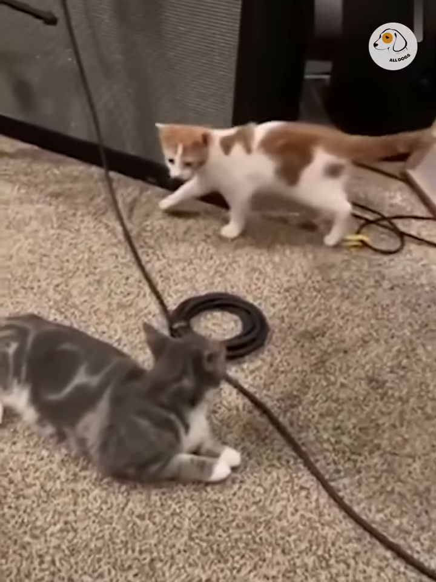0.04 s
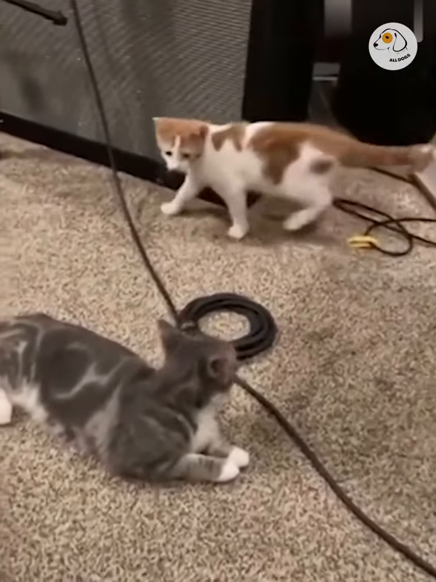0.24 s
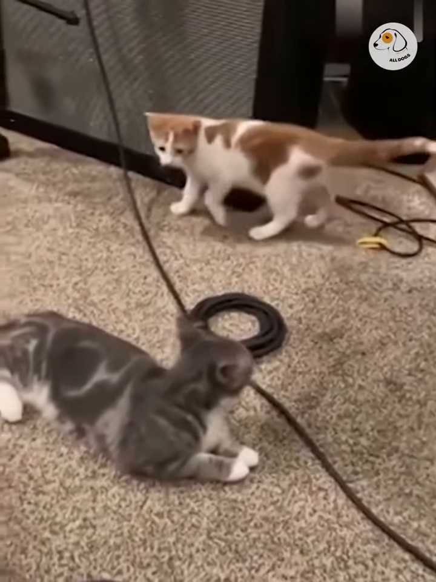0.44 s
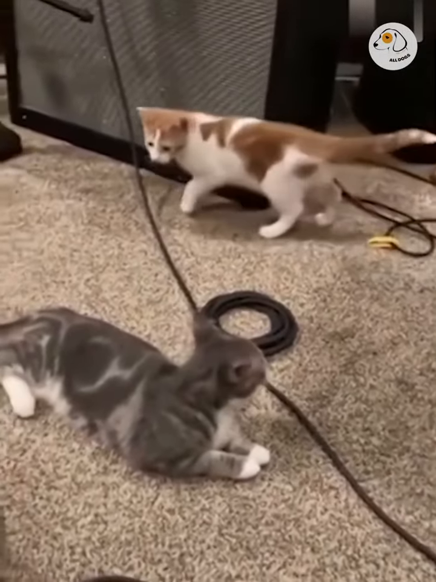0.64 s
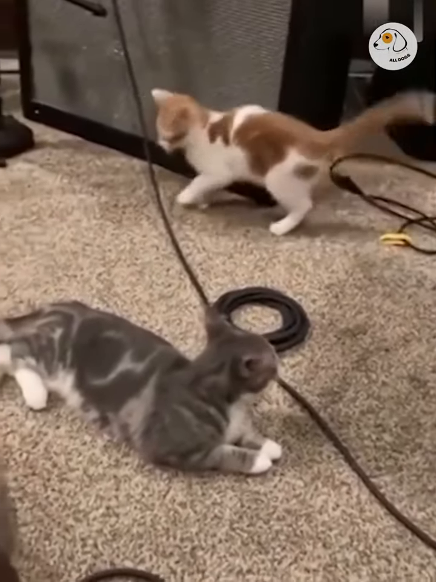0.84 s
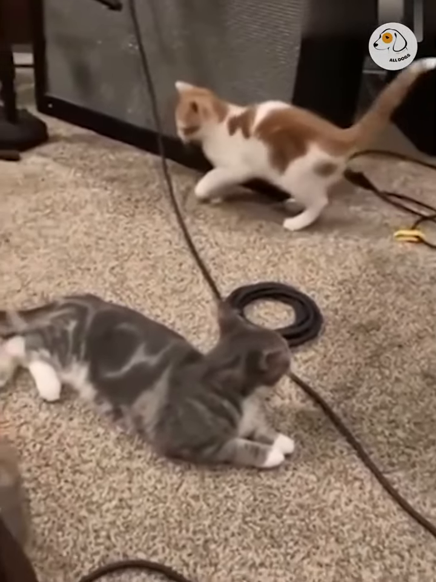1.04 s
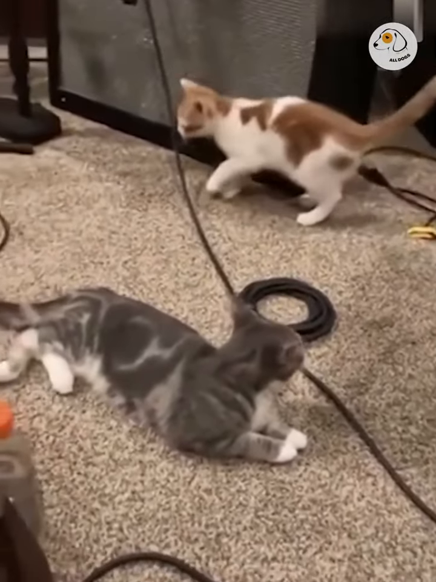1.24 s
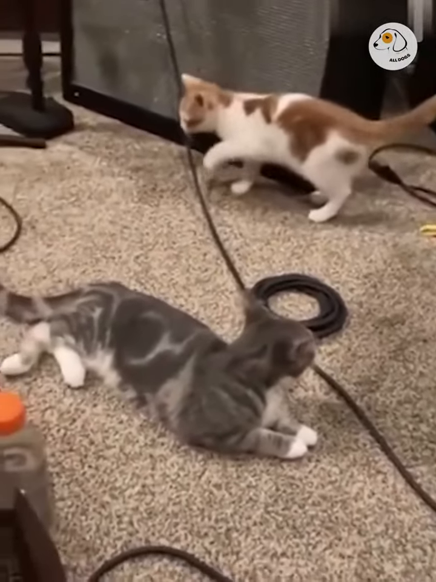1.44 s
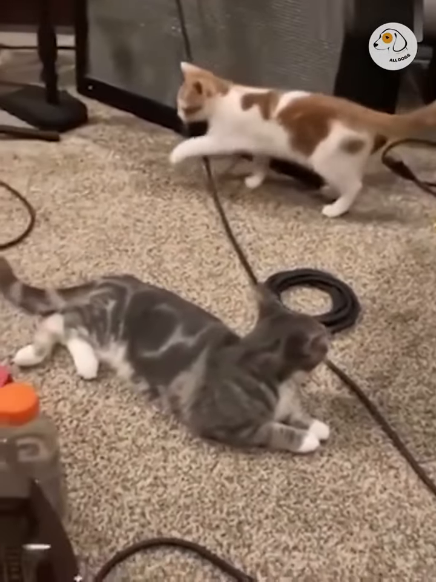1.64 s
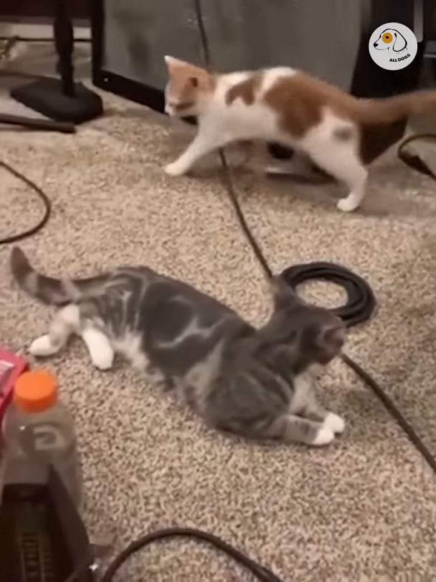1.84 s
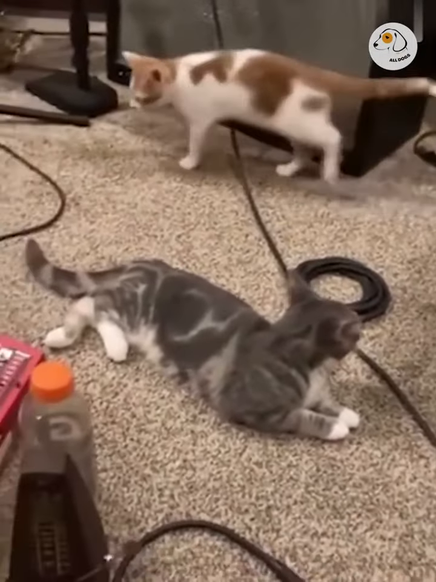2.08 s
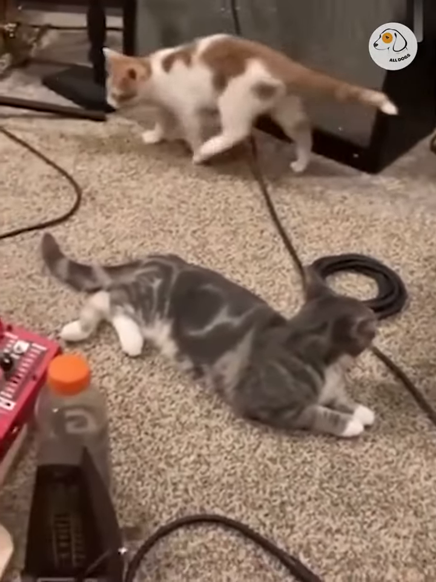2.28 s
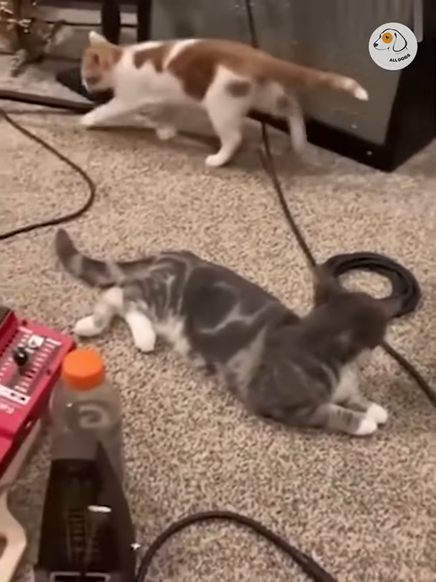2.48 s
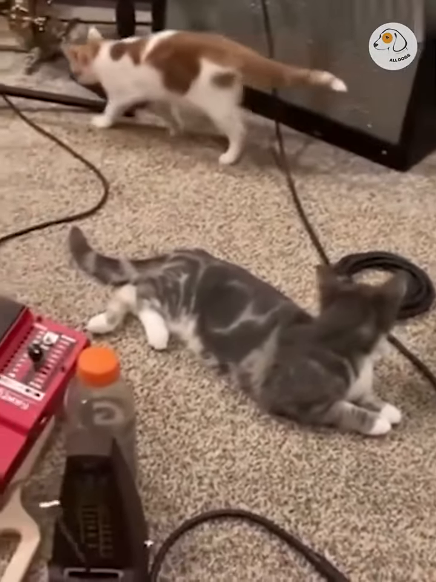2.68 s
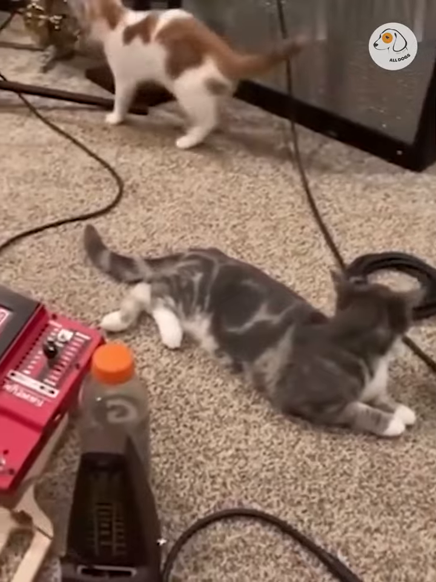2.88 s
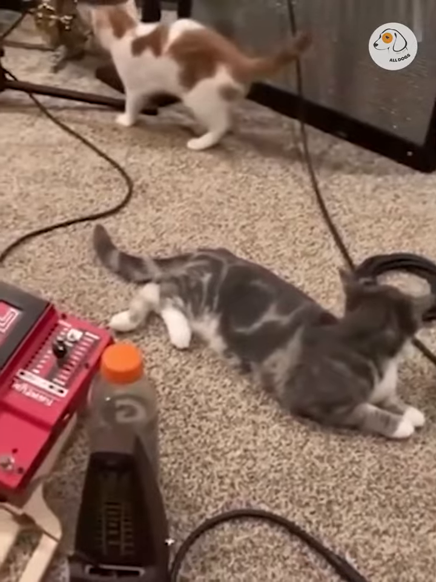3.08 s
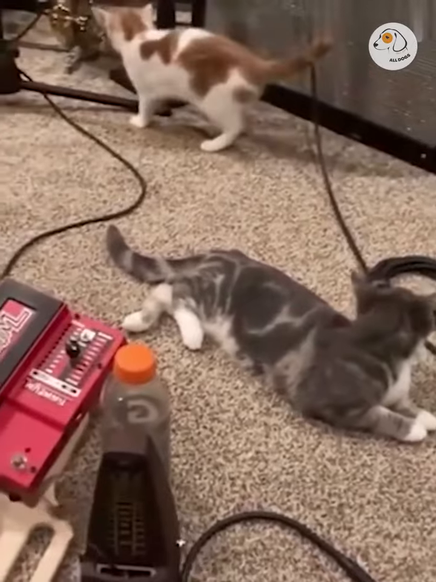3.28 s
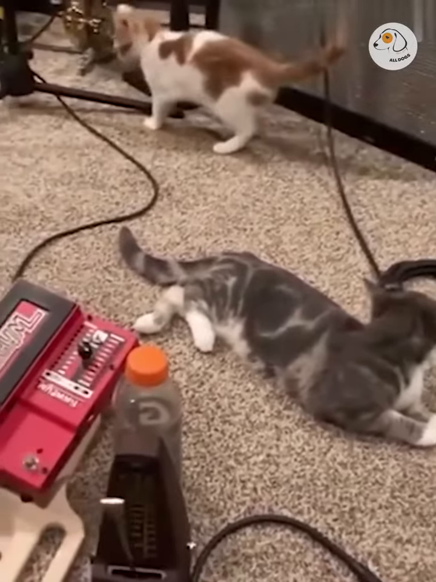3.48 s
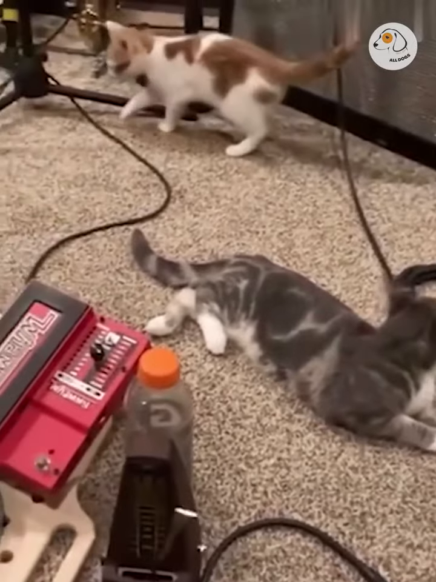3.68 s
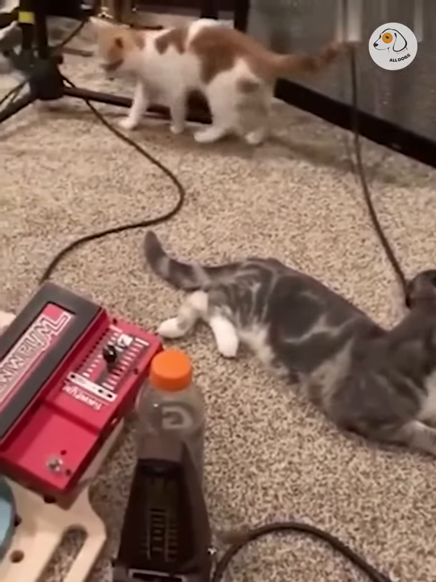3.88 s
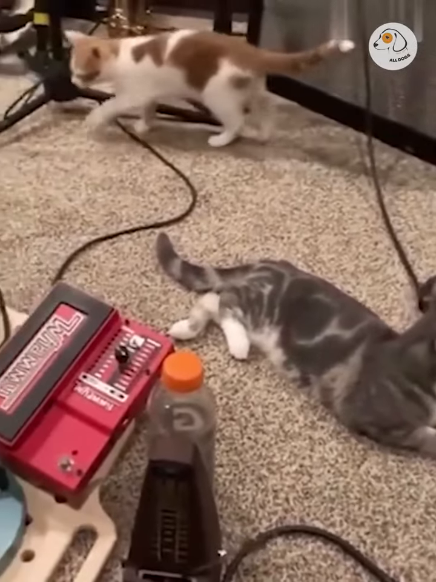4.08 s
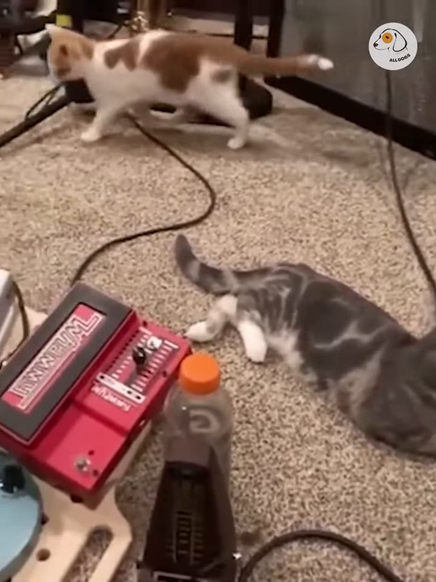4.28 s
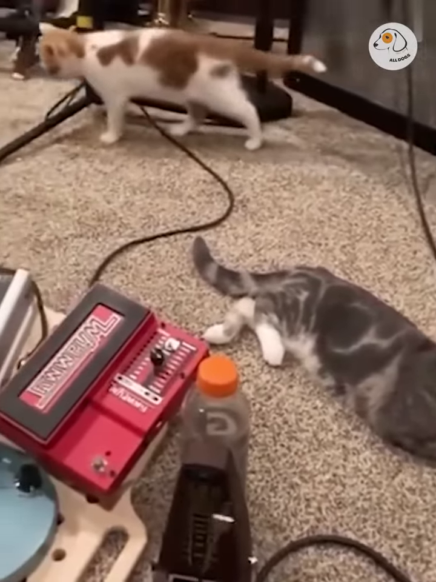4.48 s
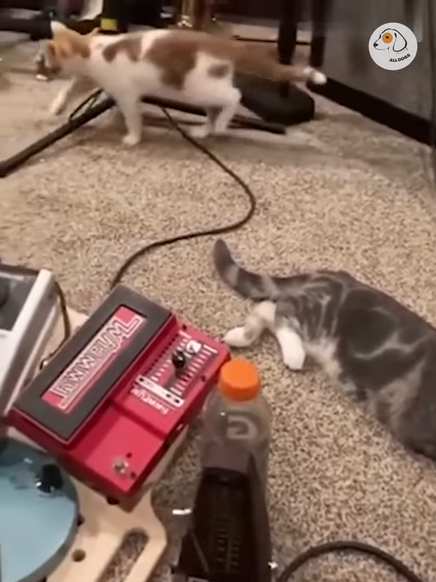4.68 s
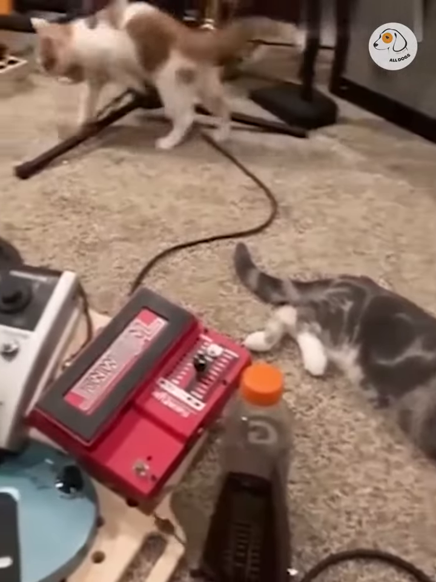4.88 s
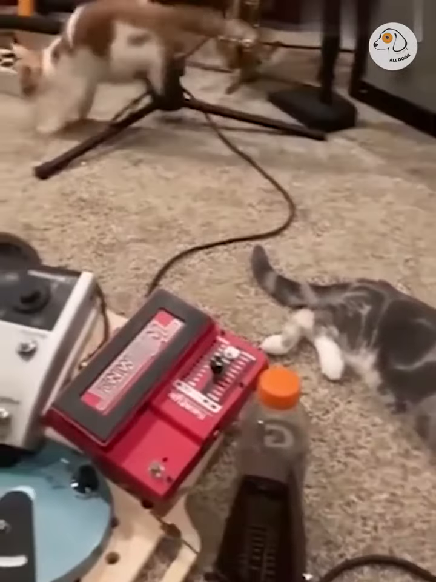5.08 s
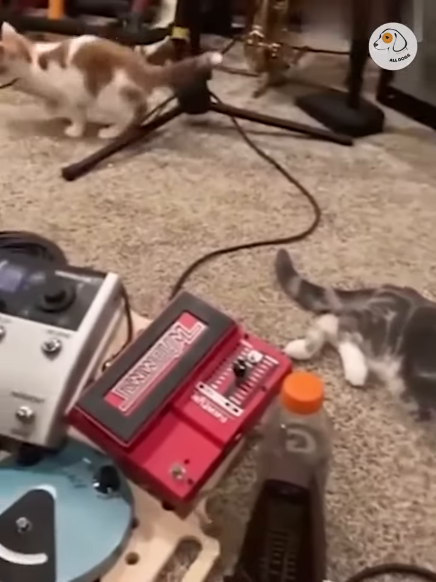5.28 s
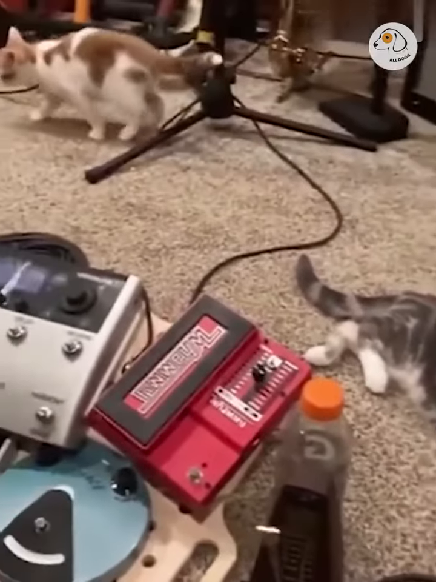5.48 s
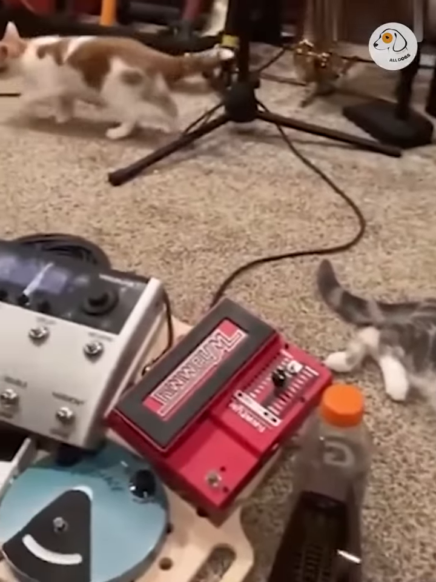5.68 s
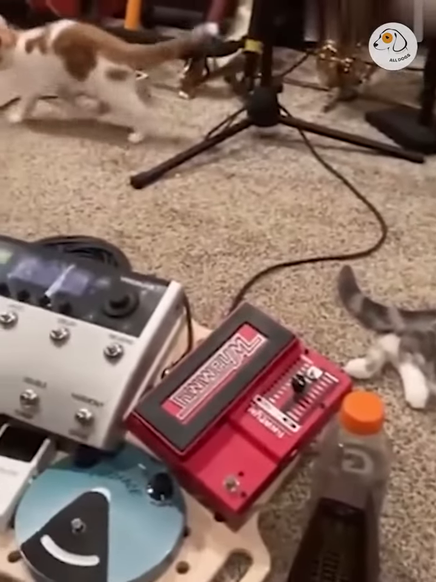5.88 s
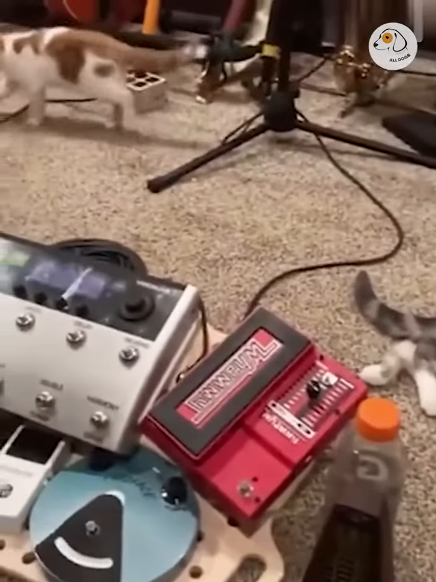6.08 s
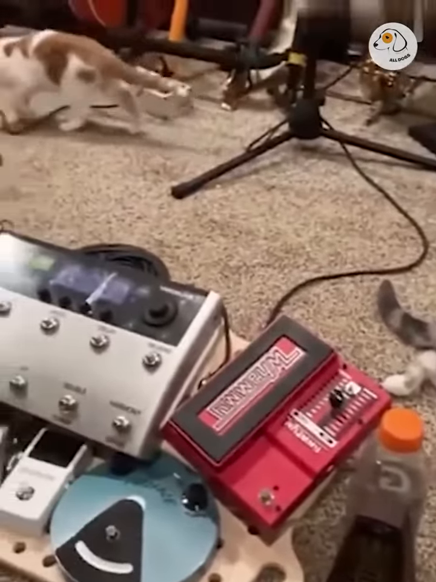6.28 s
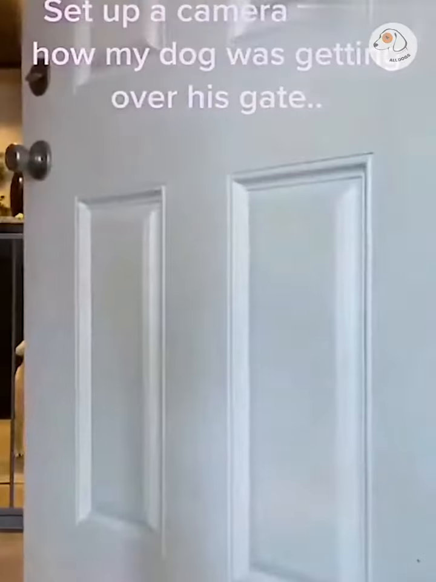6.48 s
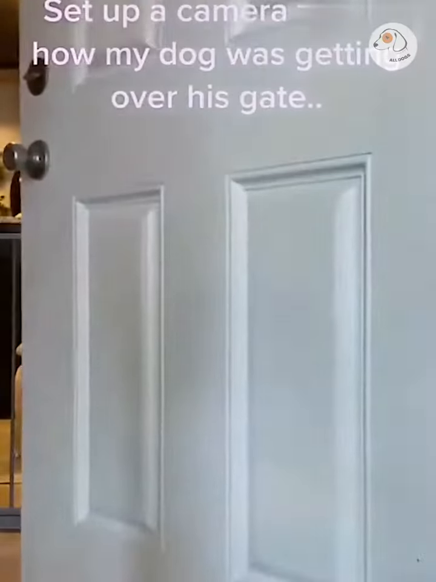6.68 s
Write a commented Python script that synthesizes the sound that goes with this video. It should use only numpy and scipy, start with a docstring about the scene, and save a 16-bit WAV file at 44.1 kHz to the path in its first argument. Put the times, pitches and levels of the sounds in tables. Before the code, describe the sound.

A small, quiet carpeted room with a soft, steady ventilation hum, mostly low and central, with faint wider air above it. A pendulum metronome close to the microphone ticks slowly, at about 0.6, 1.6, 2.65, 3.65, 4.7 and 5.7 seconds. Each tick is a loud, sharp steel crack with a hollow knock, a bright clink and a tiny loose rattle, ringing for less than a tenth of a second before a short reflection from the room. The ticks differ slightly in brightness; the first is crisp and the fifth a little softer. Nothing else sounds between them but the hum. At about 6.4 seconds the room cuts off abruptly, and a rush of hiss and rumble appears in the left ear only, the right silent. Around 6.6 seconds a deep thump lands, and grainy, faintly ringing midrange noise surges two or three times until the end.

```python
"""A pendulum metronome ticks about once a second on the carpet of a small, quiet room.
Ventilation hums low all the while: shaped noise plus narrow resonances. Each beat is a cracking click
that sets the hollow case and the steel works ringing, as fading sine tones, and the room answers.
Near the end the room falls silent and a rush of noise takes over in the left ear: hiss and rumble,
with one low thump and a grainy midrange that surges."""
import sys
import numpy as np
from scipy import signal
from scipy.fft import rfft, irfft, next_fast_len
from scipy.io import wavfile

SR = 44100
rng = np.random.default_rng(int(sys.argv[2]) if len(sys.argv) > 2 else 0)


def log_audio(samples):
    """Write samples as a 16-bit WAV file to the path given in sys.argv[1]."""
    # one column per channel
    frames = np.atleast_2d(samples).T
    # limit to full scale, then quantise
    limited = np.clip(frames, -1, 1)
    pcm = np.round(limited * 32767).astype(np.int16)
    wavfile.write(sys.argv[1], SR, pcm)


N = 297221
TIME = np.arange(N) / SR

# Ventilation, colour of its rumble and air: (frequency [Hz], relative density [dB per Hz])
AIR_COLOUR = [(20, -36), (35, -16), (49, -2.5), (150, -1), (200, -9.5), (280, -9), (310, -16), (460, -27.5),
              (800, -28.5), (1600, -33.5), (2000, -38), (4700, -46), (5600, -55.5), (10800, -60.5),
              (13000, -81), (16000, -92)]
# Ventilation, how wide the air sounds: (frequency [Hz], side minus mid [dB])
AIR_SIDE = [(110, -58.5), (380, -35), (700, -0.5), (1300, -5), (4400, -4), (8000, -16.5)]
# Ventilation, narrow duct resonances: (frequency [Hz], width [Hz], rms level [dB])
DUCT_HUM = [(159.2, 15, -42.5), (222.5, 4, -46.5), (257.6, 7.2, -43.5), (361.5, 17, -52),
            (498.5, 8.6, -66.5), (683, 9, -59), (716.5, 5, -64), (773.4, 13, -61), (954.6, 12, -66.5),
            (1590, 160, -70)]

# Rush, colour of the rumble: (frequency [Hz], relative density [dB per Hz])
RUMBLE_COLOUR = [(15, -15.5), (35, -27), (52, -1), (80, -6), (150, -16), (400, -37), (1500, -82)]
# Rush, colour of the hiss: (frequency [Hz], relative density [dB per Hz])
HISS_COLOUR = [(88, -43), (150, -1), (263, -7.5), (352, -5.5), (912, -9.5), (1170, -9.5), (1940, -14.5),
               (6110, -15), (9920, -29.5), (11400, -26), (15500, -27)]
# Rush, colour of the midrange: (frequency [Hz], relative density [dB per Hz])
MIDRANGE_COLOUR = [(100, -7), (300, 13.5), (700, -6), (1400, -1), (2200, 1), (4500, -9), (12000, -39)]
# Rush, resonances that ring in the surges: (frequency [Hz], width [Hz], relative level [dB])
SURGE_RINGS = [(1157, 16, 1.5), (1356, 23, 2), (1703, 11, 2), (1896, 9.1, -6), (2330, 45, -10)]
# Rush, swells of the midrange: (time of the top [s], height [dB])
MIDRANGE_SURGES = [(6.584, 14.5), (6.66, 7), (6.706, 12.5)]
# Rush, one low thump: (time [s], frequency [Hz], level [dB], time to fall 60 dB [s])
LOW_THUMP = (6.6, 53, -12.5, .22)
RUSH_START_S = 6.387
SURGE_ATTACK_S, SURGE_RELEASE_S = 0.0091, 0.08  # time constants of climb and fall
RUMBLE_FOLLOWS, HISS_FOLLOWS = 0.21, 0.077  # share of a surge's dB that lifts rumble and hiss too

# How the room answers a beat: (frequency [Hz], relative level [dB], time to fall 60 dB [s])
ROOM_BANDS = [(294.4, -9, 0.53), (694, 4, 0.16), (1535, 4.5, 0.21), (3060, 4.5, 0.185), (5700, 5, 0.15),
              (10500, 10.5, 0.11), (13000, 11, .095), (16000, 4, 0.08)]
# Ringing modes of case and steel works, before each beat's own balance:
# (frequency [Hz], relative level [dB], time to fall 60 dB [s])
CASE_MODES = [(608.5, -29.5, 0.082), (757.6, -18.5, 0.14), (979, -27, 0.09), (1135, -14, 0.045),
              (1233, -8, 0.078), (1282, -5.5, 0.074), (1413, -16.5, 0.045), (1668, -19, 0.028),
              (1746, -15.5, 0.055), (1872, -12.5, 0.05), (2070, -7, 0.085), (2142, -4.5, 0.077),
              (2353, -20.5, 0.044), (2500, -19, 0.05), (2800, -17, .05), (3100, -18, .05),
              (3280, -26.5, 0.018), (3380, -18.5, 0.053), (5170, -28, 0.045), (6180, -9.5, 0.04),
              (6920, -19, 0.04), (6420, -16.5, .045), (7400, -22, 0.033), (8970, -20.5, 0.044),
              (9360, -26.5, 0.03), (10400, -22.5, 0.02), (10284, -28.5, .045), (10683, -25, .07),
              (1270, -39, 0.51), (2600, -46.5, 0.39), (2086, -35.5, 0.5), (2156, -36.5, 0.58),
              (2160, -38, 0.68), (2140, -37, 0.47), (6210, -63, 1)]
# Colour of the pallet's crack: (frequency [Hz], relative density [dB per Hz])
CRACK_COLOUR = [(150, -25.5), (350, -5), (520, -6), (740, 2), (900, -6.5), (1500, 0), (2800, -5.5),
                (4200, -11.5), (6200, -9), (8000, -12), (10500, -8.5), (12000, -17), (15500, -16.5)]
# Beats of the escapement: (time [s], strength [dB], wait from first touch to landing [s],
# first touch [dB], lift of the high case modes [dB], lift of the crack and clink [dB],
# glint in the low treble [dB], lift of the top octave [dB], delay of the ceiling echo [s])
ESCAPEMENT_BEATS = [(0.628, -2.5, 0.00086, 3, -1, 5.5, 1, 1, 0.012),
                    (1.6275, -2, 0.00094, -11, 0.5, 1.5, 5, -6, .0160),
                    (2.648, -2.5, .0015, -11.5, 1, 6, 4.5, 2, .0165),
                    (3.6504, -2, .0011, -14.5, 0, 1.5, 2.5, 2.5, .0170),
                    (4.6697, -3.5, .0016, -4, 0.5, -3, -0.5, -2.5, 0.022),
                    (5.6724, -2, .0016, -10, 0, 1, -8.5, -3.5, .0190)]
GLINT_WIDTH_HZ, TOP_OCTAVE_HZ = 680, 8000
BOUNCE_HZ = 1500  # below this the beat is a clean knock, above it a chattering crack
TOUCHES_PER_S = 5000
PARTS_T60_S, PARTS_UNEVEN_DB = 0.035, 3.5  # fall time and random spread of the small parts
CUTOFF_HZ = 15900


def from_db(db):
    """Turn decibels into a plain multiplier."""
    return 10 ** (np.asarray(db) / 20)


def at_hz(points, hz, axis=1):
    """Read one column of a table between its points, on a log-frequency axis."""
    table = np.array(points)
    return np.interp(np.log(np.maximum(hz, 1)), np.log(table[:, 0]), table[:, axis])


def noise(gain_at, size):
    """Noise of rms 1 whose spectrum follows gain_at(Hz)."""
    spectrum = rfft(rng.standard_normal(size)) * gain_at(np.fft.rfftfreq(size, 1 / SR))
    x = irfft(spectrum, size)
    return x / np.std(x)


def coloured(colour, size):
    """Noise with the balance of bass and treble listed in a colour table; rms about 1."""
    return noise(lambda hz: from_db(at_hz(colour, hz)), next_fast_len(size))[:size]


def resonant(rows, size):
    """Noise concentrated around resonances, each with its centre, width and level."""
    out = 0
    for centre, width, level_db in rows:
        ringing = noise(lambda hz: 1 / (1 + ((hz - centre) / width) ** 2), size)
        out = out + from_db(level_db) * ringing
    return out


def dying(t, t60, rise_s):
    """Loudness curve that swells from t = 0 while a decay of 60 dB per t60 pulls it down."""
    t = np.maximum(t, 0)
    return (1 - np.exp(-t / rise_s)) * np.exp(-np.log(1000) * t / t60)


def stereo(mid, side):
    """Left and right ear from the shared middle and the difference between the sides."""
    return np.array([mid + side, mid - side])


def delayed(t, x, wait_s):
    """The same sound, later."""
    return np.interp(t - wait_s, t, x, left=0)


def dulled(x, cut_hz):
    """Second-order low-pass: the treble above cut_hz fades away."""
    return signal.sosfilt(signal.butter(2, min(cut_hz, 0.45 * SR), fs=SR, output="sos"), x)


def pulse(level_db, size):
    """The most compact click, starting at once, with this spectrum (dB per FFT bin); energy 1."""
    # folding the cepstrum onto positive times gives the minimum-phase click
    cepstrum = irfft(np.log(from_db(level_db)), size)
    cepstrum[1:size // 2] *= 2
    cepstrum[size // 2 + 1:] = 0
    x = irfft(np.exp(rfft(cepstrum)), size)
    return x / np.linalg.norm(x)


def ventilation(air_db=-38.5):
    """Soft rumbling air with narrow duct resonances; the bass is central, the hiss wider."""
    size = next_fast_len(N)
    hz = np.fft.rfftfreq(size, 1 / SR)
    side = irfft(rfft(coloured(AIR_COLOUR, size)) * from_db(at_hz(AIR_SIDE, hz)), size)
    air = from_db(air_db) * stereo(coloured(AIR_COLOUR, size), side)
    return (air + resonant(DUCT_HUM, size))[:, :N]


def surges(rows):
    """Lift in dB: each surge climbs quickly to its top and sinks back more slowly."""
    lift_db = 0
    for s, height_db in rows:
        climb, fall = (TIME - s) / SURGE_ATTACK_S, (s - TIME) / SURGE_RELEASE_S
        lift_db = lift_db + height_db * np.exp(np.minimum(climb, fall))
    return lift_db


def low_thump():
    """One deep sine tone that swells quickly and dies away."""
    s, hz, level_db, t60 = LOW_THUMP
    t = TIME - s
    return from_db(level_db) * dying(t, t60, SURGE_ATTACK_S) * np.sin(2 * np.pi * hz * t)


def rush(rumble_db=-34, hiss_db=-30, mid_db=-44.0, rings_db=-53, grain_db=-1.0, grain_hz=120):
    """Hiss, rumble, thump and a grainy, ringing midrange that swells; in the left ear only."""
    size, lift_db = next_fast_len(N), surges(MIDRANGE_SURGES)
    rumble = from_db(rumble_db + RUMBLE_FOLLOWS * lift_db) * coloured(RUMBLE_COLOUR, N)
    hiss = from_db(hiss_db + HISS_FOLLOWS * lift_db) * coloured(HISS_COLOUR, N)
    # slow noise, in dB, makes the midrange level flutter
    grain = grain_db * noise(lambda hz: 1 / (1 + (hz / grain_hz) ** 2), size)[:N]
    midrange = from_db(mid_db) * coloured(MIDRANGE_COLOUR, N)
    midrange = midrange + from_db(rings_db) * resonant(SURGE_RINGS, size)[:N]
    left = rumble + low_thump() + hiss + from_db(lift_db + grain) * midrange
    return np.array([left, np.zeros(N)])


def wash(t, first_per_s=1200, crowding_s=0.02):
    """Reflections, sparse at first, crowding in with the square of the time; mid and side."""
    chance = np.minimum(first_per_s * (1 + (t / crowding_s) ** 2) / SR, 1)
    arrives = rng.random((2, len(t))) < chance
    # fewer reflections are each made stronger, so the average power stays even
    return arrives * rng.choice([-1, 1], (2, len(t))) / np.sqrt(chance)


def room_response(t, build_s=0.018, late_db=-23, late_stretch=3.3, side_db=-9):
    """A wash of reflections, dying faster in the treble over a faint longer tail."""
    mid, side = wash(t)
    arrivals = rfft(stereo(mid, from_db(side_db) * side))
    hz = np.fft.rfftfreq(len(t), 1 / SR)
    centres = np.log([row[0] for row in ROOM_BANDS])
    out = 0
    # each row of the identity matrix picks out one band, blending into its neighbours
    for share, (_, level_db, t60) in zip(np.eye(len(ROOM_BANDS)), ROOM_BANDS):
        band = irfft(arrivals * np.interp(np.log(hz + 1), centres, share), len(t))
        early = dying(t, t60, build_s)
        late = from_db(late_db) * dying(t, late_stretch * t60, build_s)
        out = out + band * from_db(level_db) * (early + late)
    return out


def blows(t, t60, rise_s, landing):
    """Loudness curve of a first touch and the landing that follows it."""
    wait_s, first_db = landing
    first = from_db(first_db)
    return first * dying(t, t60, rise_s) + (1 - first) * dying(t - wait_s, t60, rise_s)


def contact(t, glint_db, top_db, glint_hz=4800):
    """A click in the crack's colour, with the low treble and top of this beat raised or lowered."""
    hz = np.fft.rfftfreq(len(t), 1 / SR)
    glint = glint_db * np.exp(-0.5 * ((hz - glint_hz) / GLINT_WIDTH_HZ) ** 2)
    top = top_db * np.clip(np.log2((hz + 1) / TOP_OCTAVE_HZ) * 2 + 0.5, 0, 1)
    return pulse(at_hz(CRACK_COLOUR, hz) + glint + top, len(t))


def case_ring(t, high_db, landing, split_hz=1550, rise_s=0.0005, scatter_db=2.5, detune=0.0053):
    """The blow rings every mode; level and pitch vary a little from beat to beat."""
    out = 0
    for k, (hz, level_db, t60) in enumerate(CASE_MODES):
        lift_db = high_db * (hz > split_hz) + scatter_db * rng.standard_normal()
        pitch = hz * (1 + detune * rng.standard_normal())
        tone = blows(t, t60, rise_s, landing) * np.sin(2 * np.pi * pitch * t)
        out = out + (-1) ** k * from_db(level_db + lift_db) * tone
    return out


def pallet_crack(t, touch, landing, t60=0.024, rise_s=0.0003):
    """Steel chatters on steel: a dense cluster of touches as the tooth lands; energy 1."""
    hits = (rng.random(len(t)) < TOUCHES_PER_S / SR) * rng.choice([-1, 1], len(t))
    touches = hits * blows(t, t60, rise_s, landing)
    crack = signal.fftconvolve(touches, touch)[:len(t)]
    crack = signal.sosfilt(signal.butter(2, BOUNCE_HZ, "high", fs=SR, output="sos"), crack)
    return crack / (np.linalg.norm(crack) + 1e-12)


def small_parts(t, count=72, low_hz=2300, high_hz=15800, rise_s=0.0006):
    """Treble modes of wheel, spring and rod, one row each, shared by all beats; and their pitches."""
    hz = low_hz * (high_hz / low_hz) ** ((np.arange(count) + rng.random(count)) / count)
    gain = from_db(PARTS_UNEVEN_DB * rng.standard_normal(count)) * np.sqrt(hz / low_hz)
    tones = np.sin(2 * np.pi * hz[:, None] * t)
    return gain[:, None] * tones * dying(t, PARTS_T60_S, rise_s), hz


def clink(touch, parts, hz):
    """The small parts ring as strongly as the touch excites their pitches; energy 1."""
    drive = np.interp(hz, np.fft.rfftfreq(len(touch), 1 / SR), np.abs(rfft(touch)))
    x = (rng.choice([-1, 1], len(hz)) * drive) @ parts
    return x / np.linalg.norm(x)


def rattle(t, jolt, count=4, earliest_s=0.008, latest_s=0.034, t60=0.3):
    """The loose rod jogs the case and small parts a few more times, ever more lightly."""
    waits = rng.uniform(earliest_s, latest_s, count)
    signs = rng.choice([-1, 1], count)
    return sum(sign * from_db(-60 * wait / t60) * delayed(t, jolt, wait)
               for wait, sign in zip(waits, signs))


def metronome(ring_db=-5.0, crack_db=0.5, steel_db=-1.0, rattle_db=-2, rattle_knock_db=5, knock_db=3,
              ring_send_db=-39, knock_send_db=-19, crack_send_db=-25, parts_send_db=-22,
              ceiling_db=-6, knock_echo_db=5, steel_echo_db=-4,
              ceiling_hz=1400, spread_hz=1300, width_db=-8.5):
    """Every beat: knock, ring, crack and clink, one reflection from the ceiling, and the room."""
    t, out = np.arange(SR * 2 // 3) / SR, np.zeros((2, N + SR))
    parts, parts_hz = small_parts(t)
    for (s, strength_db, wait_s, first_db, high_db, bright_db,
         glint_db, top_db, ceiling_s) in ESCAPEMENT_BEATS:
        landing, touch = (wait_s, first_db), contact(t, glint_db, top_db)
        ring = from_db(ring_db) * case_ring(t, high_db, landing)
        knock = from_db(knock_db) * delayed(t, dulled(touch, BOUNCE_HZ), wait_s)
        steel = delayed(t, clink(touch, parts, parts_hz), wait_s)
        crack = from_db(crack_db) * pallet_crack(t, touch, landing)
        snap = from_db(bright_db) * (crack + from_db(steel_db) * steel)
        jogs = from_db(rattle_db) * rattle(t, steel + from_db(rattle_knock_db) * knock)
        direct = knock + ring + snap + jogs
        # a second clink with its own random signs widens the steel
        side = from_db(steel_db + width_db) * delayed(t, clink(touch, parts, parts_hz), wait_s)

        upward = from_db(ceiling_db) * ring + from_db(knock_echo_db) * knock
        upward = dulled(dulled(upward, ceiling_hz), ceiling_hz)
        ceiling = delayed(t, upward + from_db(steel_echo_db) * steel, ceiling_s)

        # low case modes spread all round; high ones are beamed forward and reach the walls less
        sent = from_db(ring_send_db) * dulled(ring, spread_hz)
        sent = sent + from_db(knock_send_db - knock_db) * knock
        sent = sent + from_db(crack_send_db) * touch + from_db(parts_send_db) * steel
        # the microphone moves, so every beat meets new reflections
        diffuse = signal.fftconvolve(sent[None], room_response(t), axes=1)[:, :len(t)]

        start = round(s * SR)
        beat = stereo(direct, side) + ceiling + diffuse
        out[:, start:start + len(t)] += from_db(strength_db) * beat
    return out[:, :N]


def scene():
    """The ticking room, then the rush in its place."""
    return np.where(TIME < RUSH_START_S, metronome() + ventilation(), rush())


def record(dry):
    """Peaks beyond full scale are clipped, then a steep low-pass cuts the top."""
    top_cut = signal.ellip(10, 0.1, 80, CUTOFF_HZ, fs=SR, output="sos")
    return signal.sosfilt(top_cut, np.clip(dry, -1, 1))


dry = scene()
out = record(dry)
log_audio(out)
```